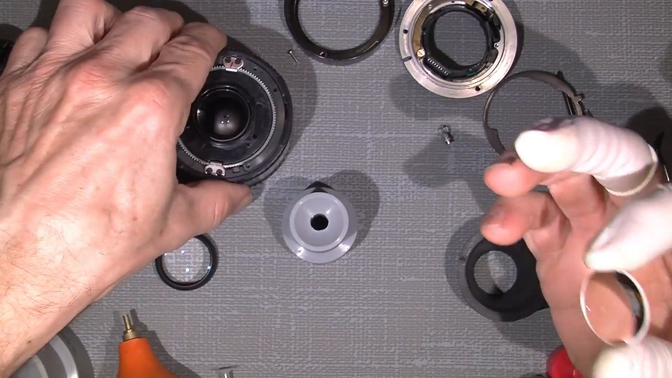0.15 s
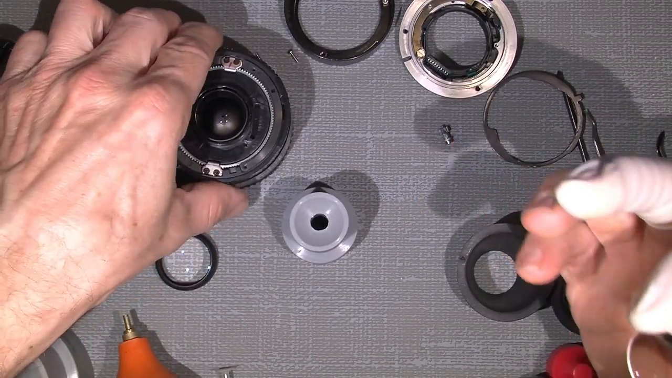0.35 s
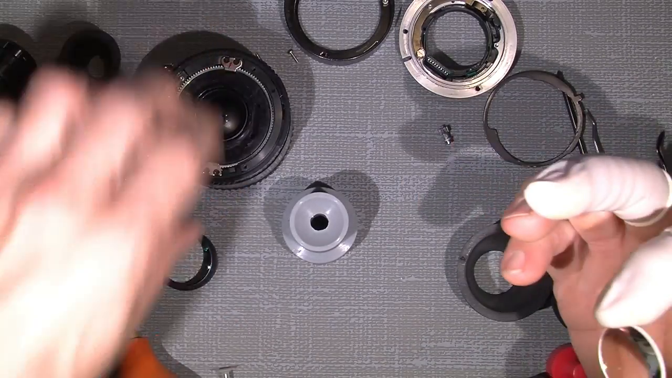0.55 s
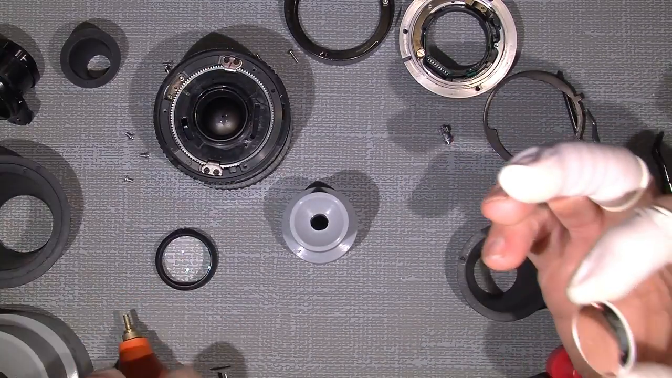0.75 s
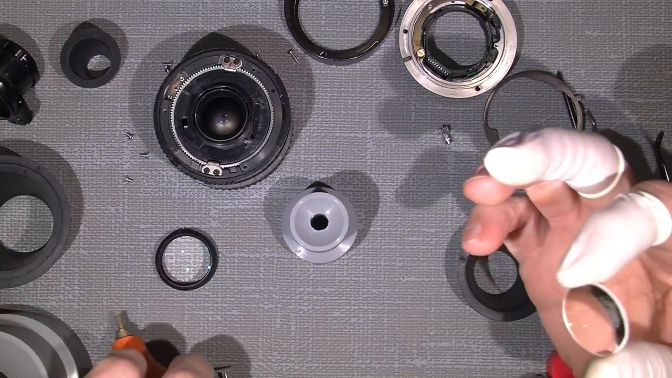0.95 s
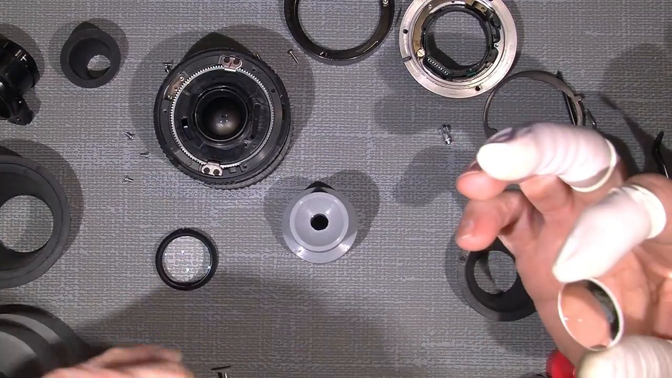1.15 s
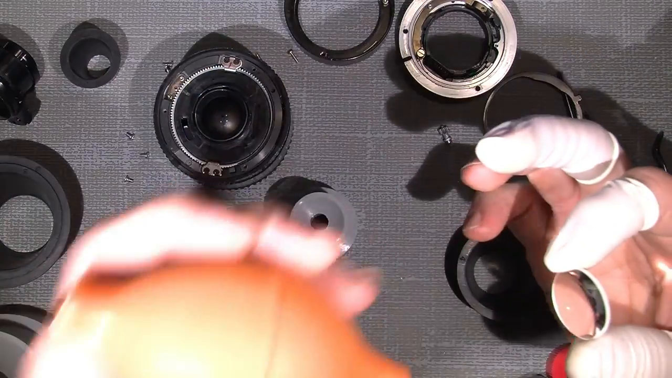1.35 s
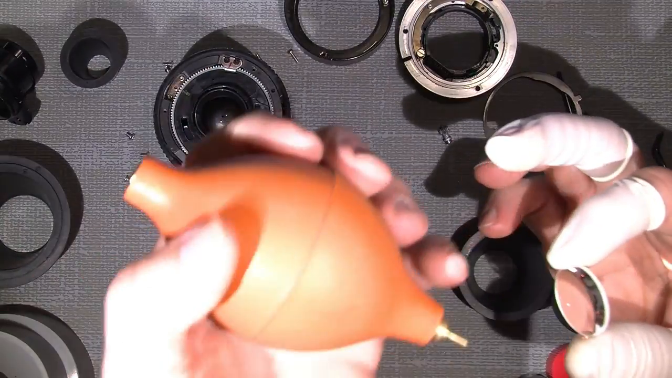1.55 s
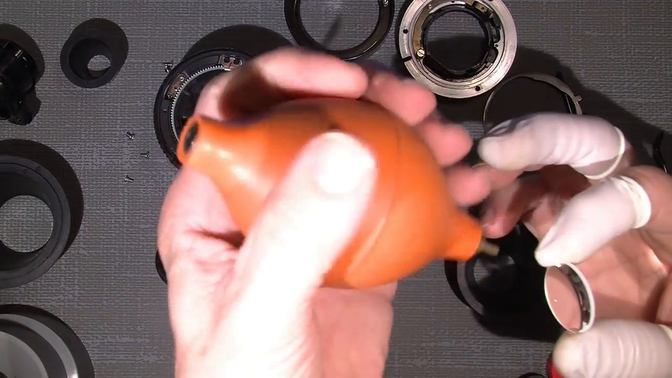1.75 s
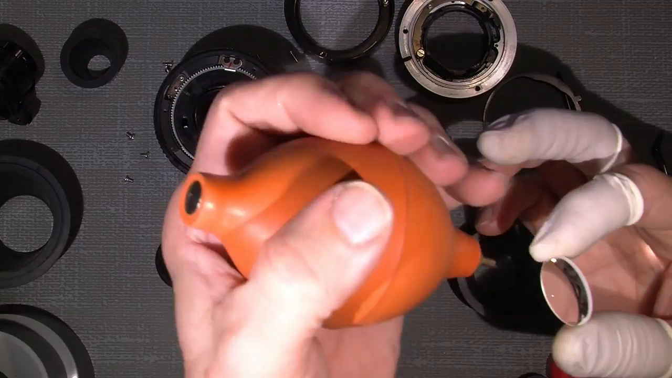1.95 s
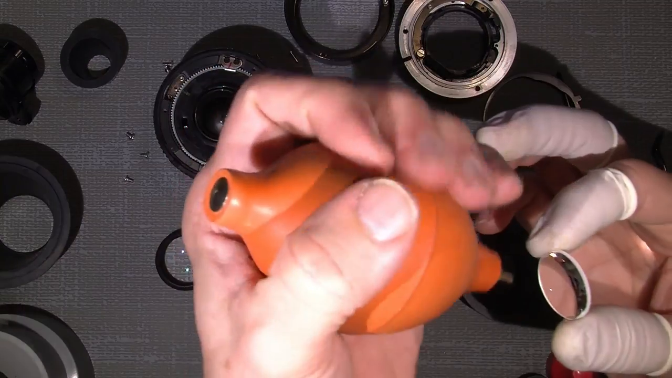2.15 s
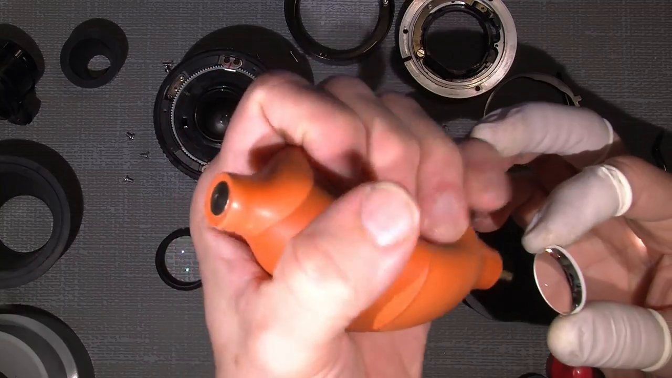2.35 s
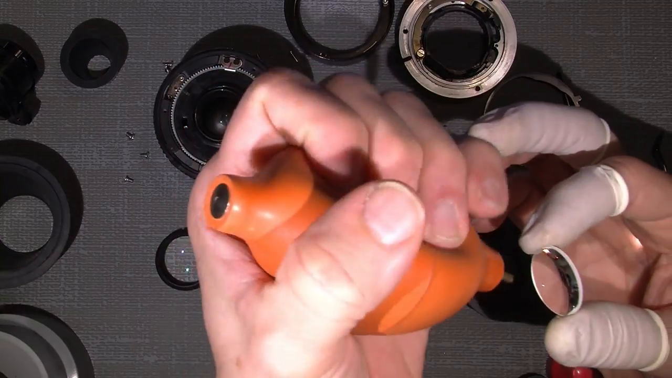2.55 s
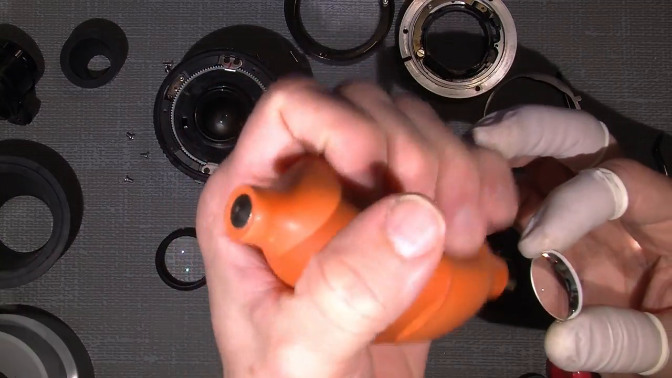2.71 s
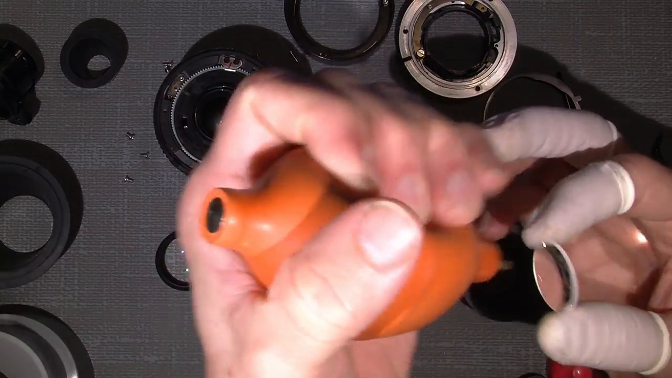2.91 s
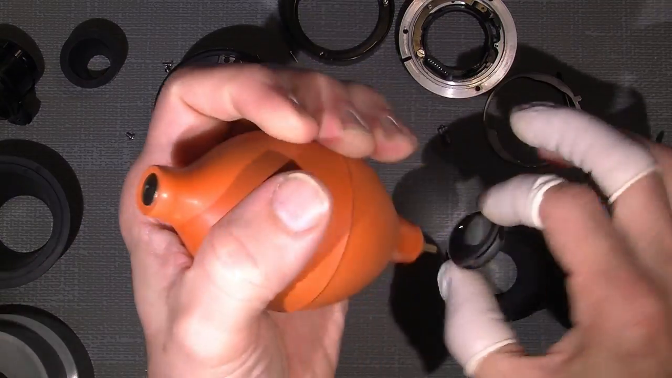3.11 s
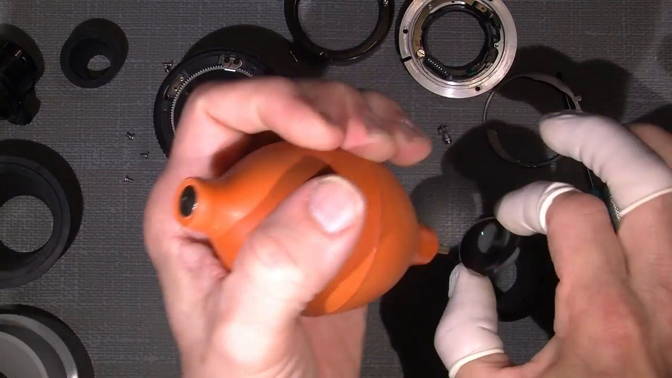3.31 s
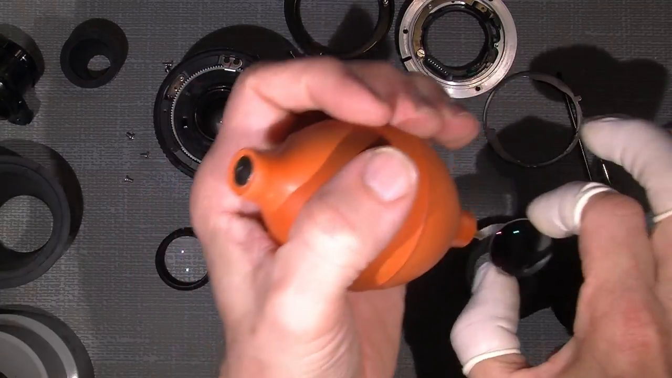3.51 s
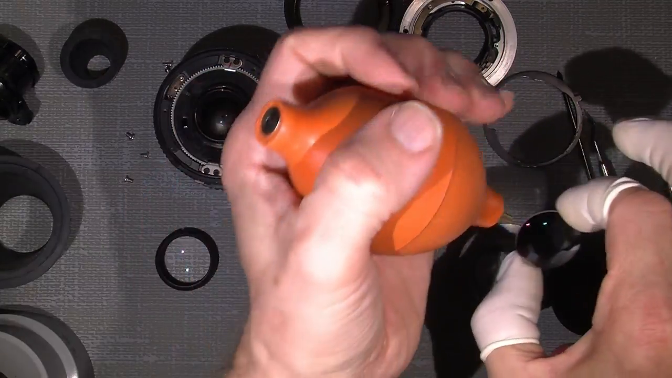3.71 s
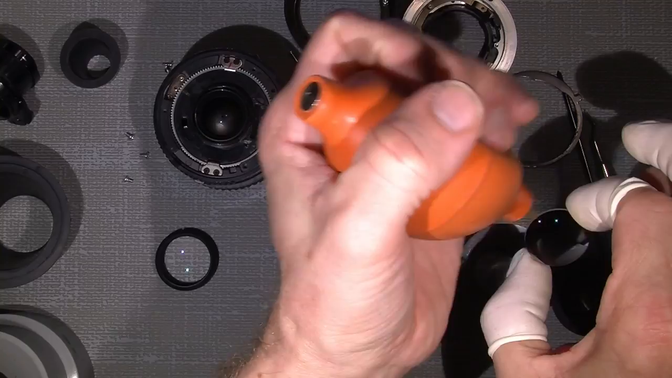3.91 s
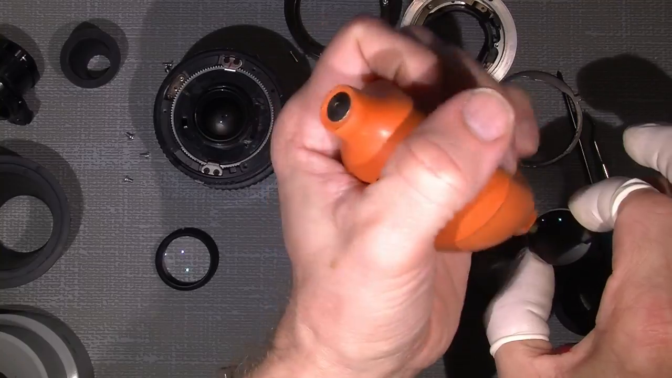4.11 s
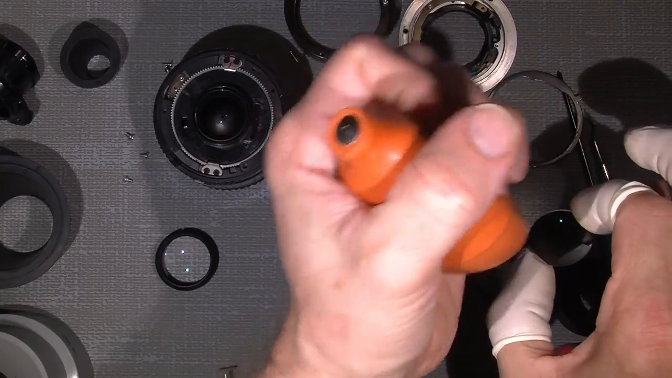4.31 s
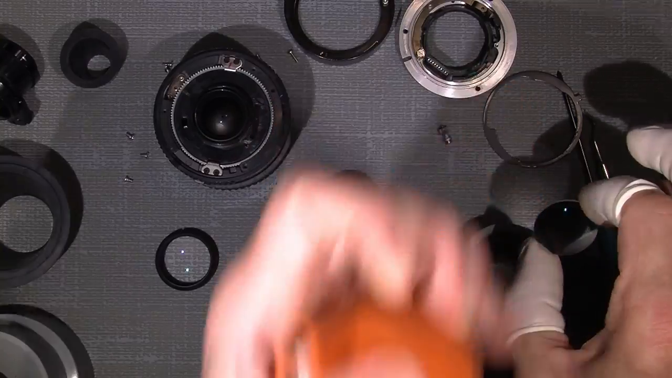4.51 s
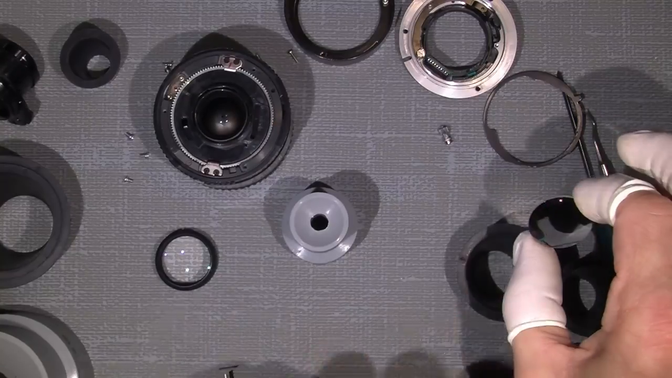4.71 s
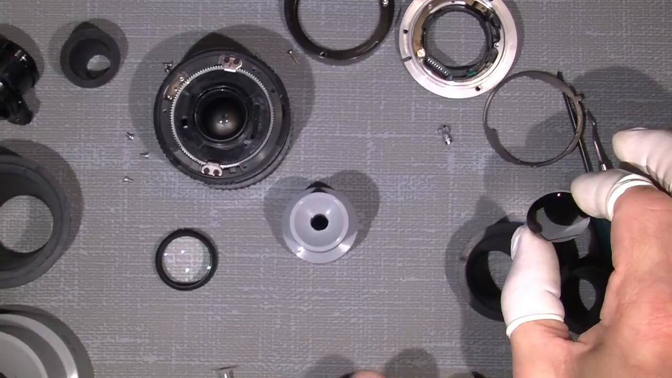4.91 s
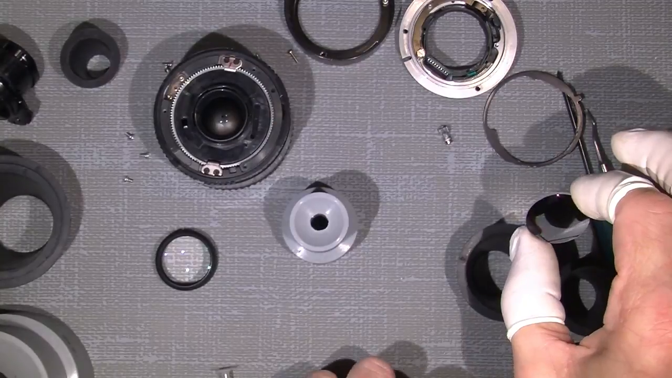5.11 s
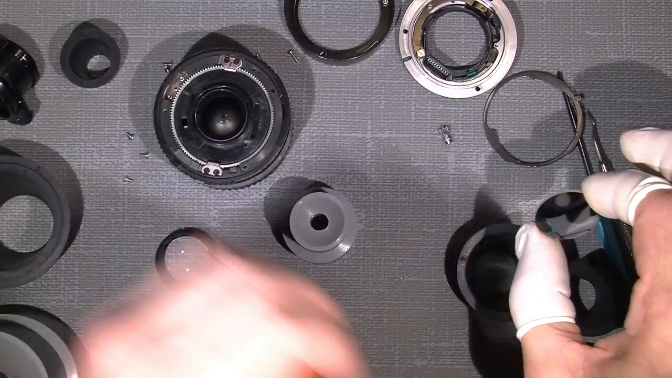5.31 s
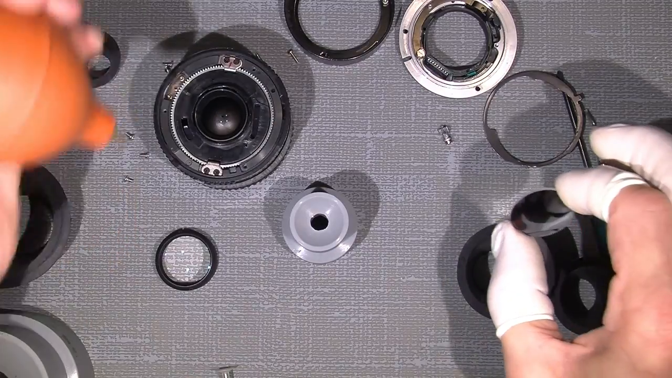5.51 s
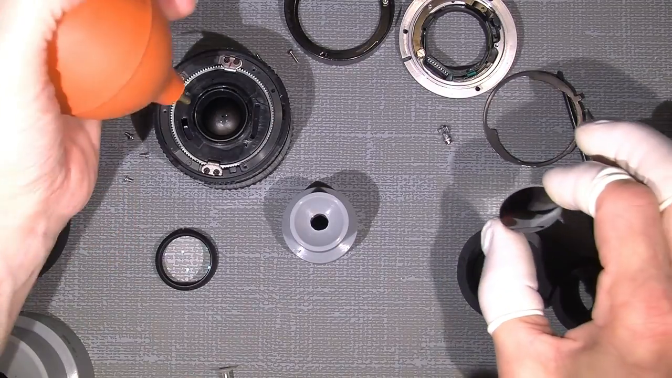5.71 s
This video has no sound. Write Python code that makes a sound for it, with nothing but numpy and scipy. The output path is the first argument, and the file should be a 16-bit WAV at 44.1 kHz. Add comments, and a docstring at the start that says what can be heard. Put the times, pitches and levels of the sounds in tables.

```python
"""In a quiet, humming workroom a rubber air blower is squeezed three times at a small lens held in the fingers,
then three times at the lens set down. Each squeeze shuts the inlet valve with a pop, made of brief pressure dips
and decaying modes, and drives a jet of shaped noise; on release, air is sucked back through the valve as thinner noise.
Fingers rustle as noise and grains, small parts click and the bench thuds softly as damped modes."""
import sys
import numpy as np
from scipy import signal
from scipy.fft import rfft, irfft
from scipy.io import wavfile

SR = 44100
rng = np.random.default_rng(int(sys.argv[2]) if len(sys.argv) > 2 else 0)


def log_audio(samples):
    """Write samples as a 16-bit WAV file to the path given in sys.argv[1]."""
    # one column per channel
    frames = np.atleast_2d(samples).T
    # limit to full scale, then quantise
    limited = np.clip(frames, -1, 1)
    pcm = np.round(limited * 32767).astype(np.int16)
    wavfile.write(sys.argv[1], SR, pcm)


N = 253575
TIME, FREQ = np.arange(N) / SR, np.fft.rfftfreq(N, 1 / SR)

# Squeezes of the bulb, levels before the trims in jet(). Each row: start, rise and fall in seconds,
# roundness of the top (exponent), hiss of the jet, rush on the lens, extra fizz, extra boom
# and draught on the microphones in dB.
SQUEEZES_HELD = [(2.122, 0.086, 0.081, 2.36, -30.5, -36.5, -1.5, -3.5, -81),
                 (2.405, 0.055, 0.062, 1.97, -39, -43, 2.5, 0, -83),
                 (2.622, 0.065, 0.085, 1.37, -29.5, -39.5, 0, -1, -73)]
SQUEEZES_DOWN = [(3.697, 0.068, 0.059, 1.4, -44, -43.5, 2, 2, -83),
                 (3.941, 0.063, 0.066, 1.44, -37.5, -39.5, -2.5, -5, -80),
                 (4.173, 0.069, 0.072, 1.47, -31.5, -41, -4, -3.5, -82)]
# Relative spectrum of air in the inlet, lens held. Each row: frequency in Hz, density in dB per Hz.
INLET_SPECTRUM_HELD = [(60, -12), (200, -2.5), (450, -9.5), (1000, -7), (2100, -3), (2900, -3.5),
                       (4500, -2), (7000, -4), (10000, -2.5), (12200, -6), (14000, -6), (15800, 0)]
# Relative spectrum of a light contact. Each row: frequency in Hz, density in dB per Hz.
CONTACT_SPECTRUM = [(150, -2), (450, -6), (720, 13.5), (1000, 5), (1300, 6), (2200, 0.5), (4000, 4),
                    (6500, -1.5), (10000, -2.5), (15500, -29)]
# Left-right likeness of nearby noise. Each row: frequency in Hz, correlation (1 is identical).
AIR_LIKENESS = [(100, 0.92), (1000, 1), (3000, 0.83), (6000, 0.84), (10000, 0.39), (15000, 0.84)]
RUSH_SAG_DB = 16  # fall of rush and draught from the top of a squeeze to its ends


def amp(db):
    """Decibels are logarithmic: converts them to amplitude gain."""
    return 10 ** (np.asarray(db) / 20)


def unit(x):
    """Normalises mean power: scales to rms 1."""
    return x / np.sqrt(np.mean(x ** 2) + 1e-20)


def read(points, hz):
    """Interpolates a table linearly on a logarithmic frequency axis."""
    f, value = np.transpose(points)
    return np.interp(np.log(hz + 1), np.log(f + 1), value)


def add(mix, s, sound):
    """Superposition: mixes a sound in at time s."""
    part = mix[..., round(s * SR):][..., :sound.shape[-1]]
    part += sound[..., :part.shape[-1]]


def colour(spectrum, peaks=()):
    """Spectral shaping: gain per frequency, a broad spectrum with local peaks and dips."""
    level = read(spectrum, FREQ)
    for hz, width, db in peaks:
        level = level + db / (1 + (2 * (FREQ - hz) / width) ** 2)
    return amp(level)


def below(hz):
    """Crossover: share of each frequency that lies under a steep edge."""
    return 1 / (1 + (FREQ / hz) ** 8)


def noise(gain, likeness):
    """Partial coherence: coloured stereo noise of rms 1, its mid and side weighted by left-right likeness."""
    mid, side = rfft(rng.standard_normal((2, N)))
    same = np.clip(read(likeness, FREQ), -1, 1)
    mid, side = mid * np.sqrt(1 + same), side * np.sqrt(1 - same)
    return unit(irfft(np.array([mid + side, mid - side]) * gain, N))


def flutter(rate_hz, depth_db):
    """Random amplitude modulation: a gain of slow noise, with its rms depth in dB."""
    wander = irfft(rfft(rng.standard_normal(N)) * below(rate_hz), N)
    return amp(depth_db * unit(wander))


def arch(t, rise, fall, roundness=2):
    """Gesture envelope: 1 at the start, 0 at the top after the rise, 1 again after the fall, then more."""
    return np.maximum(1 - t / rise, (t - rise) / fall) ** roundness


def ring(modes, t):
    """Modal decay: exponentially dying sines, each slightly detuned at random on every blow."""
    total = np.zeros(len(t))
    for hz, db, t60 in modes:
        detuned_hz = hz * (1 + rng.normal() / 200)
        total += amp(db - 60 * t / t60) * np.sin(2 * np.pi * detuned_hz * t)
    return total


def fan(level_db=-61):
    """Stationary noise with narrow peaks: the room's noise floor with the hum and whine of a fan."""
    # Relative noise spectrum. Each row: frequency in Hz, density in dB per Hz.
    floor_spectrum = [(20, -36), (38, -14), (55, -11), (75, -13), (115, -11.5), (150, -16.5), (185, -5.5),
                      (260, -11), (650, -13.5), (1500, -20), (2600, -23), (4000, -26.5), (12000, -32.5),
                      (15800, -39.5)]
    # Hum and whine. Each row: frequency in Hz, width in Hz, lift in dB.
    fan_tones = [(218, 7.8, 9), (2236, 58, 10), (2265, 110, 2)]
    # Left-right likeness of the floor. Each row: frequency in Hz, correlation (negative is opposed).
    floor_likeness = [(30, -0.5), (70, -1), (180, -0.52), (550, -0.8), (1650, -0.53), (5000, -0.00057),
                      (15000, -0.11)]
    return amp(level_db) * noise(colour(floor_spectrum, fan_tones), floor_likeness)


def clicks(tap_db=-1, tick_db=1.0, settle_s=0.017):
    """Damped impact: parts held in fingers touch twice, each a dull tap, a sharp tick and a brief metal ring."""
    # Light clicks of lens parts and blower, levels before the trims. Each row: start in seconds,
    # pitch of the tap in Hz, tap in dB, tick in dB, t60 in seconds, ring of the lens cell in dB,
    # second touch in dB relative to the first.
    touches = [(.048, 2020, -61, -62.5, 0.015, -83, 3.5), (.1012, 1160, -48.5, -64, 0.014, -85, -25),
               (1.157, 860, -58, -53.5, 0.031, -65, -3.5), (1.296, 730, -54, -51.5, 0.017, -62.5, -5),
               (1.922, 646, -51.5, -61, .016, -69, -16), (2.935, 830, -72, -53, 0.037, -63, -14),
               (4.636, 705, -51, -51, 0.025, -71, -3.5), (5.017, 680, -50.5, -59, 0.012, -76, -5),
               (5.257, 870, -64, -63, 0.03, -76, 3.5), (5.483, 890, -63, -50.5, 0.013, -60, -7)]
    # Modes of the metal lens cell. Each row: frequency in Hz, level in dB, t60 in seconds.
    cell_modes = [(7900, -8, 0.098), (9700, -0.5, 0.09), (9650, -11, .06), (10850, -2, .09)]
    out, t = np.zeros((2, N)), np.arange(SR // 8) / SR
    contact = noise(colour(CONTACT_SPECTRUM), AIR_LIKENESS)
    for first, hz, dull_db, sharp_db, t60, ring_db, again_db in touches:
        decay = amp(-60 * t / t60)
        for s, db in (first, 0), (first + settle_s, again_db):
            burst = contact[:, round(s * SR) + np.arange(len(t))] * decay
            tick = unit(burst) * np.sqrt(np.mean(decay ** 2))
            tap = ring([(hz, 0, t60), (1.85 * hz, -6, t60 / 2)], t)
            touch = amp(sharp_db + tick_db) * tick + amp(dull_db + tap_db) * tap
            touch = touch + amp(ring_db) * ring(cell_modes, t)
            add(out, s, amp(db) * touch)
    return out


def thuds(onset_s=0.0023):
    """Modal excitation: the hand leaves the lens barrel and the bench top answers with its low modes."""
    # Soft knocks on the bench. Each row: start in seconds, level in dB before the mode levels.
    knocks = [(.053, -53), (.069, -54), (.336, -58.5)]
    # Modes of the bench top. Each row: frequency in Hz, level in dB, t60 in seconds.
    bench_modes = [(110, -2.5, 0.21), (170, 7.5, 0.059), (215, 1.5, 0.11), (273, -20, 0.11)]
    out, t = np.zeros(N), np.arange(SR // 3) / SR
    for s, db in knocks:
        add(out, s, amp(db) * ring(bench_modes, t) * (1 - np.exp(-t / onset_s)))
    return out


def rustle(level_db=-2.0, grain_db=-7.0, grains_per_s=110, sag_db=14.5):
    """Stick-slip friction: skin slides with a soft hiss and slips in tiny separate grains."""
    # Strokes of skin on rubber and metal, levels before the trims.
    # Each row: start in seconds, length in seconds, level in dB.
    strokes = [(0.297, 0.043, -61.5), (.735, .07, -73), (1.056, .22, -67.5), (1.353, 0.13, -65.5),
               (1.415, 0.49, -64), (1.882, .15, -69), (4.39, 0.22, -64.5), (4.6, 0.16, -67.5),
               (4.94, 0.11, -72), (5.077, 0.11, -67.5), (5.266, 0.26, -65), (5.48, 0.095, -67.5)]
    # Relative spectrum of the slide. Each row: frequency in Hz, density in dB per Hz.
    slide_spectrum = [(150, 2), (600, -4.5), (1500, -4), (4000, -4), (7500, -4), (9500, -6.5),
                      (11500, -5.5), (13800, -10), (16000, -19)]
    slips = rng.random(N) < grains_per_s / SR
    size = amp(2.4 * np.minimum(rng.exponential(1, N), 3.5)) * slips
    impulses = size * rng.choice([-1, 1], N)
    grains = unit(irfft(rfft(impulses) * colour(CONTACT_SPECTRUM), N))
    slide = noise(colour(slide_spectrum), AIR_LIKENESS) * flutter(rate_hz=54, depth_db=1.8)
    # each stroke swells from sag_db below its top and dies away again
    speed = sum(amp(db - sag_db * arch(TIME - s, length / 2, length / 2)) for s, length, db in strokes)
    return (amp(level_db) * slide + amp(grain_db) * grains) * speed


def jet(squeezes, spectrum, peaks, hiss_db, rush_db, flutter_db, pan_db, onset_s=0.0032):
    """Jet turbulence: the nozzle hisses, and a lower, fuller rush joins the hiss as the air strikes the lens."""
    hiss_ends_db = -55  # every squeeze has the same faint hiss level, before the trim, at both ends
    rush_lag_s = 0.0037  # the rush peaks just after the hiss
    dulling_db_per_s = 40  # the fizz fades as the bulb empties
    boom_ends_db = 5.5  # slow air at both ends is boomier
    shape, low = colour(spectrum, peaks), below(3550)
    hiss = noise(shape * np.sqrt(1 - low), AIR_LIKENESS)
    rush = noise(shape * np.sqrt(low), AIR_LIKENESS)
    fizz = irfft(rfft(hiss) * (1 - below(9500)), N)
    boom = irfft(rfft(rush) * below(1330), N)
    air, t = np.zeros((2, N)), np.arange(SR // 4) / SR
    for s, rise, fall, roundness, top_db, strike_db, fizz_db, boom_db, _ in squeezes:
        at = round(s * SR) + np.arange(len(t))
        slack = arch(t, rise, fall, roundness)
        late = arch(t - rush_lag_s, rise, fall, roundness)
        fizz_gain = amp(fizz_db - dulling_db_per_s * (t - rise))
        nozzle = hiss[:, at] + fizz[:, at] * (fizz_gain - 1)
        eddies = rush[:, at] + boom[:, at] * (amp(boom_db + boom_ends_db * late) - 1)
        puff = nozzle * amp(hiss_db + top_db + (hiss_ends_db - top_db) * slack)
        puff = puff + eddies * amp(rush_db + strike_db - RUSH_SAG_DB * late)
        add(air, s, puff * (1 - np.exp(-t / onset_s)))
    return air * flutter(rate_hz=140, depth_db=flutter_db) * amp([[pan_db], [-pan_db]])


def draught(linger_s=0.2):
    """Wind noise: stray air from each jet brushes the microphones with a faint low rumble that lingers."""
    gust = np.zeros(N)
    for s, rise, fall, *_, db in SQUEEZES_HELD + SQUEEZES_DOWN:
        gust += amp(db - RUSH_SAG_DB * arch(TIME - s, rise, fall + linger_s))
    rumble = below(79) * (1 - below(25))
    return gust * noise(rumble, [(25, 0.24), (100, 0.38)])


def pops(width_s=0.00015, echo_s=0.00626, swing_s=0.0015, ring_db=1.7):
    """Impulsive closure: air leaks by the valve, it slaps shut with pressure dips and the bulb rings."""
    # The inlet valve slaps shut. Each row: time in seconds, depth of the main dip in dB, leaking air in dB.
    slams = [(2.1234, -28, -43), (2.4047, -29, -43.5), (2.6299, -25, -41), (2.885, -40, -51.5),
             (3.6983, -29, -42), (3.943, -28, -42.5), (4.1727, -27, -38), (4.44, -40, -48)]
    # Ring of the bulb relative to a pop, before ring_db. Each row: frequency in Hz, level in dB, t60 in seconds.
    bulb_modes = [(125, -31, 0.17), (186, -22, 0.062), (294.4, -19.5, 0.059), (491, -18.5, 0.068)]
    out, t = np.zeros((2, N)), np.arange(SR // 6) / SR
    leak = noise(colour(INLET_SPECTRUM_HELD), AIR_LIKENESS)
    lead_s, touch, echo = .001, .35, .42  # the last two are sizes relative to the main slap
    for s, db, leak_db in slams:
        at = round(s * SR) + np.arange(-SR // 30, SR // 30)
        since = TIME[at] - s
        early, late = rng.uniform(-1.23, 1, 2)
        # a weaker, wider echo of the slap follows about 6 ms later
        slaps = [(-lead_s * (1 + early / 3), touch, width_s),
                 (0, 1, width_s),
                 (echo_s * (1 + late / 10), echo, 1.55 * width_s)]
        dips = sum(size * np.exp(-((since - when) / span) ** 2) for when, size, span in slaps)
        out[:, at] += amp(leak_db) * leak[:, at] * np.exp(-abs(since) / 0.0057) - amp(db) * dips
        add(out, s + swing_s, amp(db + ring_db) * ring(bulb_modes, t))
    return irfft(rfft(out) * (1 - below(117.6)), N)  # a high-pass thins the deep bass of the pops


def suction(releases, open_s=.009):
    """Refill flow: the inlet opens at once, swells or sags while the bulb refills, then dies away."""
    power, t = np.zeros(N), np.arange(SR // 3) / SR
    for s, length, db, swell_db, fade in releases:
        opening = np.minimum(t / open_s, 1)
        hold = amp(db + swell_db * (np.minimum(t / length, 1) - .5))
        dying = np.exp(-np.maximum(t - length, 0) / fade)
        add(power, s, (opening * hold * dying) ** 2)
    return np.sqrt(power)


def intake(releases, spectrum, peaks, level_db, flutter_db, pan_db, murmur_db=-1, growth=0.59, full_db=-40):
    """Orifice flow: air whistles thinly through the trembling valve, growing faster with flow than the rush below."""
    air = noise(colour(spectrum, peaks), AIR_LIKENESS)
    flow = suction(releases) / amp(full_db)  # 1 at full_db
    rush = irfft(rfft(air) * below(9800), N)
    whistle = (air - rush) * flow * flutter(rate_hz=240, depth_db=flutter_db)
    murmur = amp(murmur_db) * rush * flow ** growth
    return amp(level_db + full_db) * (whistle + murmur) * amp([[pan_db], [-pan_db]])


def room(x, wet_db=-10):
    """Reverberation: two near walls reflect, and a short diffuse tail differs at each ear."""
    # Nearby walls. Each row: delay in seconds, gain before dulling.
    echoes = [(.0062, 0.12), (0.0095, 0.33)]
    # Decay of the tail. Each row: frequency in Hz, t60 in seconds.
    decay_times = [(150, 0.49), (1000, 0.42), (5000, 0.42), (15000, 0.26)]
    hz, t, z = signal.stft(rng.standard_normal((2, SR // 2)), SR, nperseg=256)
    decay = amp(-60 * t / read(decay_times, hz)[:, None])
    tail = signal.istft(z * decay * (1 - np.exp(-t / 0.0016)), SR, nperseg=256)[1]
    response = amp(wet_db) * tail / np.linalg.norm(tail[0])
    walls = np.zeros(tail.shape[1])
    for delay, gain in echoes:
        walls[round(delay * SR)] += gain
    response = response + signal.lfilter(*signal.butter(1, 3500, fs=SR), walls)  # clutter dulls the echoes
    return x + signal.fftconvolve(x, response, axes=1)[:, :N]


def scene():
    """Superposition: blower and handling reverberate in the room; draught and fan noise are added dry."""
    # Releases of the bulb, levels before the trim. Each row: start in seconds, length in seconds,
    # hiss of the inlet in dB, swell over that length in dB, fade time constant in seconds.
    releases_held = [(2.299, 0.052, -41.5, 4.5, 0.017), (2.537, 0.061, -41.5, -4, 0.011),
                     (2.769, 0.05, -42, 0, 0.018), (2.94, 0.069, -49, 16.5, 0.017)]
    releases_down = [(3.855, 0.048, -40.5, -3, 0.014), (4.084, 0.056, -38.5, -1, 0.0057),
                     (4.323, 0.067, -38.5, -2, .02), (4.405, 0.036, -40.5, 3, 0.016)]
    # Relative spectra of jet and inlet. Each row: frequency in Hz, density in dB per Hz.
    jet_spectrum_held = [(80, -32), (300, -20), (600, -13.5), (1200, -12), (1550, -2.5), (2100, -2),
                         (3500, -6), (5500, 1), (7400, -8), (9200, -8.5), (10800, -2), (12200, -7.5),
                         (13600, -7), (15500, -18)]
    jet_spectrum_down = [(80, -24), (400, -7.5), (850, 0.5), (1300, 2), (1800, -3), (2150, 4), (3100, -6),
                         (4700, -8.5), (5700, -7), (8200, -15), (10900, -8.5), (12200, -13), (13600, -11),
                         (15500, -18)]
    inlet_spectrum_down = [(60, -14), (200, -0.5), (400, -9), (1100, -8.5), (2000, -2.5), (3000, -4),
                           (4600, -3), (7000, -1.5), (9000, -1), (10500, 0.5), (14000, -0.5), (15800, -3)]
    # Peaks and dips that colour the jet and inlet noise.
    # Each row: frequency in Hz, width in Hz, lift in dB (negative is a dip).
    jet_peaks_held = [(520, 120, 5), (1524, 76, 2.5), (1820, 31, 8), (2094, 23, 6.5), (2190, 83, 7),
                      (2550, 87, 5), (3056, 31, 9), (4680, 220, -3.5), (5300, 150, -4), (5770, 75, 3.5),
                      (7200, 350, -1), (8030, 280, 9), (9200, 500, -0.5), (10000, 250, 5.5),
                      (12200, 400, -14), (14600, 350, -1), (15200, 400, 0)]
    jet_peaks_down = [(862, 32, 3), (1200, 190, -0.5), (1740, 220, -1.5), (2100, 160, 2.5), (2270, 120, 5),
                      (2510, 210, 4), (2730, 71, 0.5), (4450, 180, -6), (5080, 120, -9), (5670, 490, 2.5),
                      (7100, 180, 4), (8300, 500, 0)]
    inlet_peaks_held = [(1320, 170, 5.5), (2030, 160, 3.5), (4470, 430, -9), (5600, 790, 5.5),
                        (8200, 700, 8), (9500, 350, -1), (11300, 1660, 11), (12200, 350, -2),
                        (13050, 830, 11), (13460, 400, 10.5), (14650, 400, -4), (15300, 300, 5)]
    inlet_peaks_down = [(1470, 160, 5.5), (4900, 120, -4), (5750, 360, 4.5), (6740, 350, 3.5),
                        (10800, 560, 7.5), (11450, 550, 6), (12450, 470, 4.5), (13240, 520, 11),
                        (14000, 400, 5.5)]
    # negative pan leans right
    held = jet(SQUEEZES_HELD, jet_spectrum_held, jet_peaks_held,
               hiss_db=-0.4, rush_db=0.13, flutter_db=1.0, pan_db=-0.34)
    held += intake(releases_held, INLET_SPECTRUM_HELD, inlet_peaks_held,
                   level_db=1.05, flutter_db=2.0, pan_db=0.2)
    down = jet(SQUEEZES_DOWN, jet_spectrum_down, jet_peaks_down,
               hiss_db=0.4, rush_db=0.2, flutter_db=1.45, pan_db=-0.4)
    down += intake(releases_down, inlet_spectrum_down, inlet_peaks_down,
                   level_db=0.7, flutter_db=1.6, pan_db=-.5)
    handling = clicks() + thuds() + rustle()
    return room(held + down + pops() + handling) + draught() + fan()


def record(dry, edge_hz=15850):
    """Band limiting: a steep linear-phase low-pass removes the top of the treble."""
    lowpass = signal.firwin(511, edge_hz, window=("kaiser", 9), fs=SR)
    return signal.oaconvolve(dry, lowpass[None], "same")


dry = scene()
out = record(dry)
log_audio(out)
```